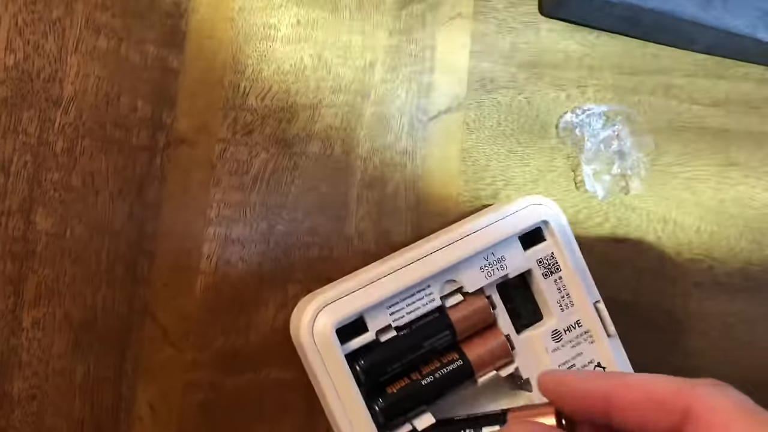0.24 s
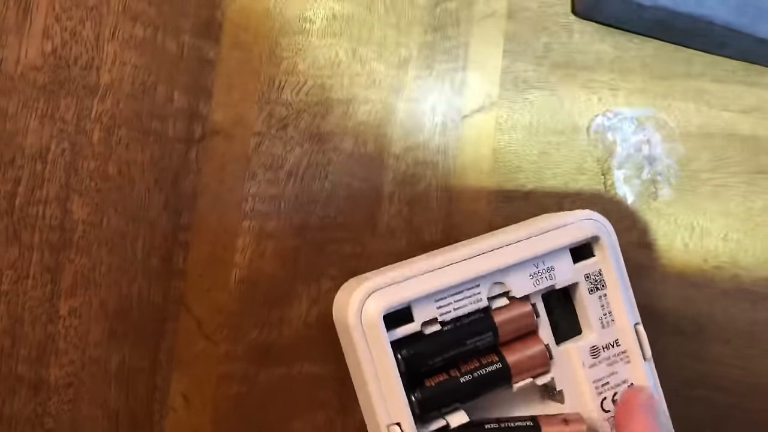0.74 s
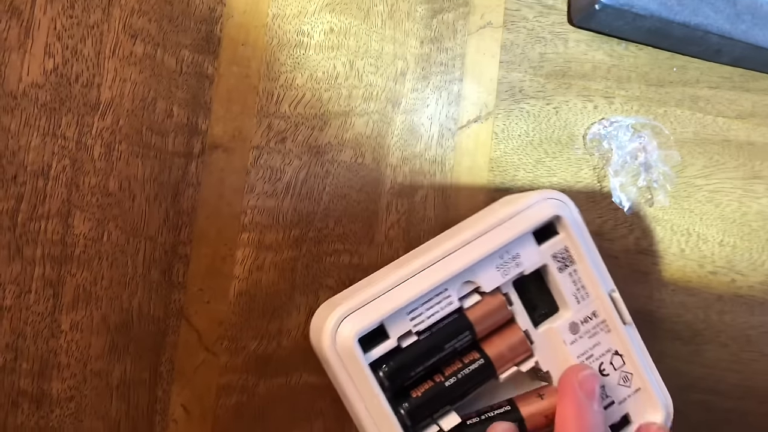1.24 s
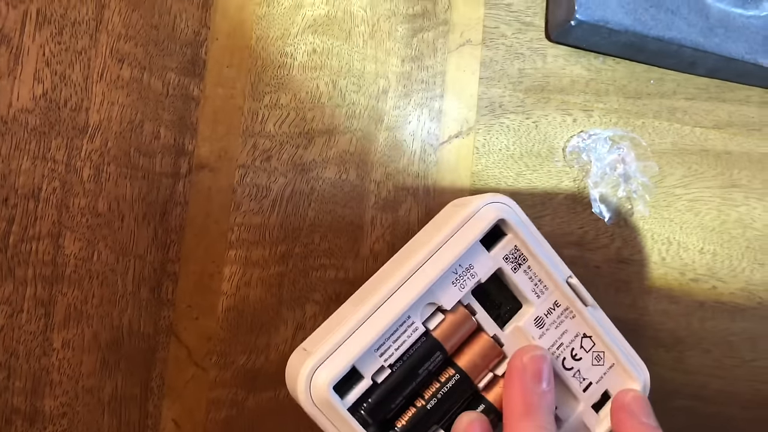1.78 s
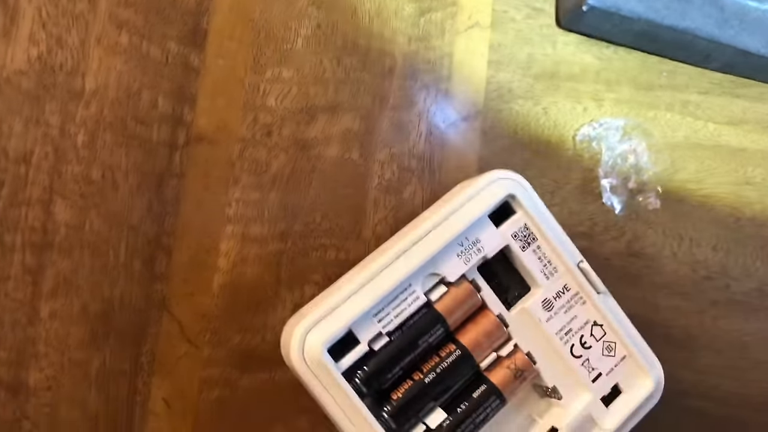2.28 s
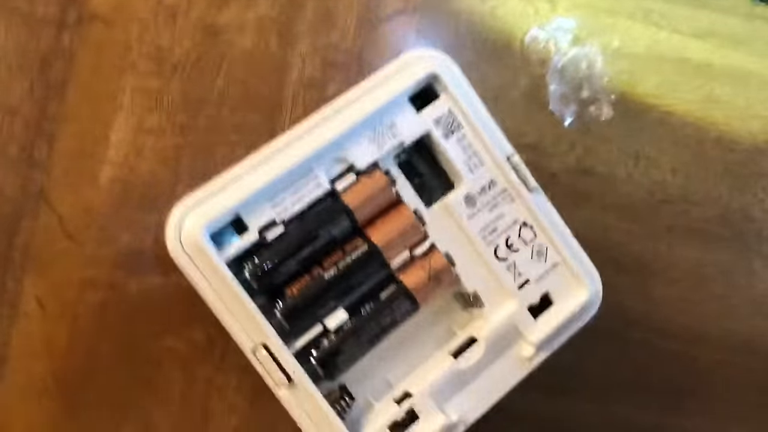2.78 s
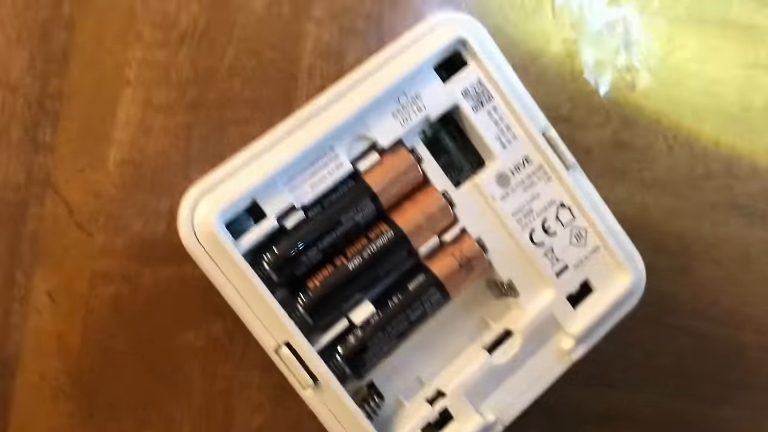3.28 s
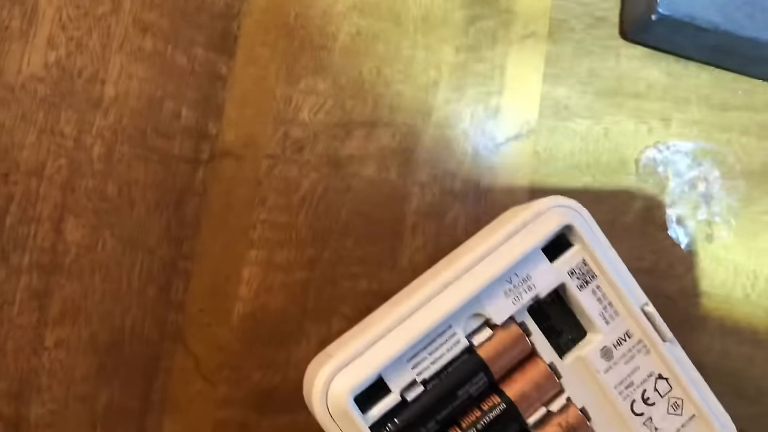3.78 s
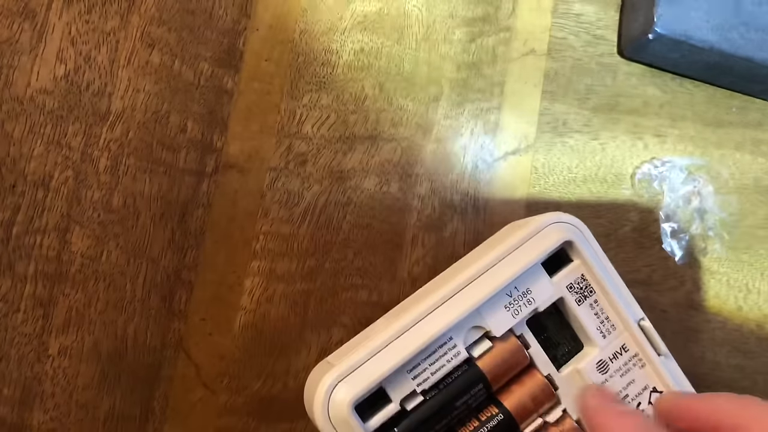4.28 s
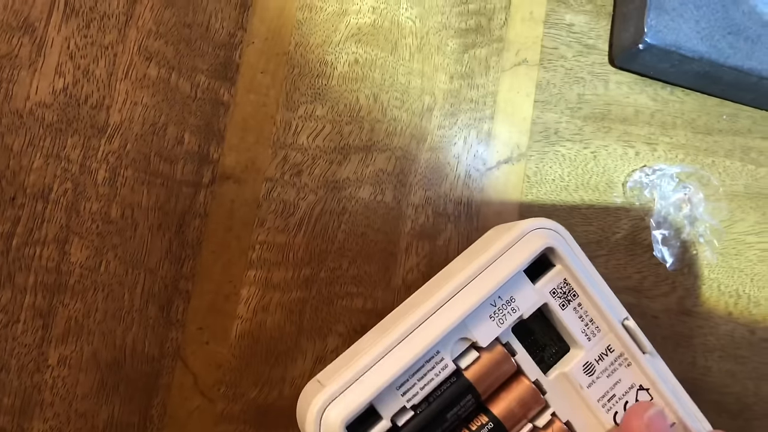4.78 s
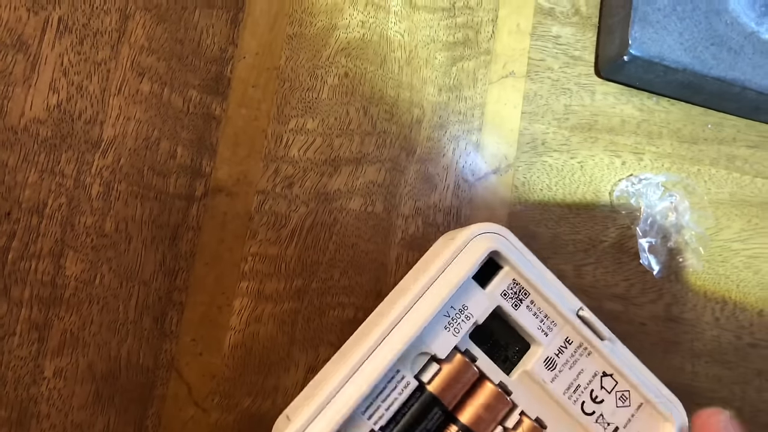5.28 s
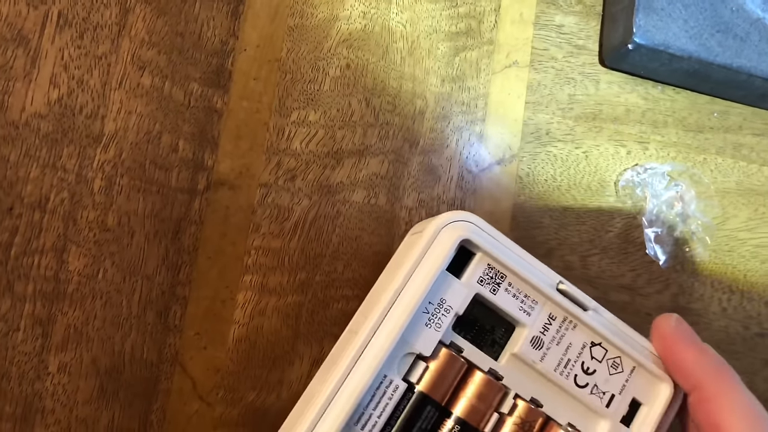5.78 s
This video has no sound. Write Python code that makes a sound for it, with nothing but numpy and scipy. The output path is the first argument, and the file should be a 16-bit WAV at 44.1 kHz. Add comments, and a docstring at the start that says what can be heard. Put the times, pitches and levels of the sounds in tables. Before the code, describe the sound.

A hushed room with a very faint low background, heard close up. Around 0.5 s light ticks and a soft rub begin as a battery is pushed, then a very loud, hard plastic snap cracks at 0.72 s with small after-clicks. Slight rubbing and ticks follow from 1.1 s, a moderate click at 1.3 s, a sharp double snap near 1.58 s, and another strong one at 1.96 s, each over a dull push. Tiny ticks and rubbing fade by 2.5 s. From 2.7 to 3.4 s soft, low wooden knocks patter, the strongest at 2.85 s. After a near-silent second, light rubbing returns at 4.5 s and a loud snap hits at 4.64 s. A smaller click comes at 5.08 s, then a quick bright cluster at 5.3 s ends in a loud snap. A faint tick at 5.56 s and a barely audible rub from 5.8 s close it.

```python
"""Batteries are pushed into a small plastic case held over a wooden table in a quiet, hushed room.
Pushes rumble in low modes; snaps ring shell, cells and contact springs, and the room answers with a tail.
Between them skin and cells rub the plastic: dense noise slips ring the case and hiss.
Midway, small knocks run through a board as falling chirps; then more pushes and snaps, and a last rub."""
import sys
import numpy as np
from scipy import signal
from scipy.fft import rfft, irfft, next_fast_len
from scipy.io import wavfile
from scipy.ndimage import uniform_filter1d, minimum_filter1d

SR = 44100
rng = np.random.default_rng(int(sys.argv[2]) if len(sys.argv) > 2 else 0)


def log_audio(samples):
    """Write samples as a 16-bit WAV file to the path given in sys.argv[1]."""
    # one column per channel
    frames = np.atleast_2d(samples).T
    # limit to full scale, then quantise
    limited = np.clip(frames, -1, 1)
    pcm = np.round(limited * 32767).astype(np.int16)
    wavfile.write(sys.argv[1], SR, pcm)


N = 266408
TOP_HZ = 16500


def undb(db):
    """dB to gain."""
    return 10 ** (np.asarray(db) / 20)


def unit(x):
    """Scale to rms 1."""
    return x / np.sqrt(np.mean(x ** 2))


def gain_at(table, size):
    """Gain of a (Hz, dB) spectrum on the bins of a transform, interpolated over log frequency."""
    table_hz, table_db = np.transpose(table)
    bin_hz = np.arange(size // 2 + 1) * SR / size
    return undb(np.interp(np.log(bin_hz + 1), np.log(table_hz), table_db))


def band(x, lo_hz, hi_hz):
    """Band-pass."""
    sos = signal.butter(2, [lo_hz, hi_hz], "bandpass", fs=SR, output="sos")
    return signal.sosfilt(sos, x)


def ring(modes, seconds, detune, pitch=1):
    """Sum of fading sines; each blow lands elsewhere, so pitch and weight scatter."""
    hz, db, t60_s = np.transpose(modes)[:, :, None]
    t = np.arange(int(seconds * SR)) / SR
    pitch_luck, level_luck = rng.standard_normal((2, len(modes), 1))
    tone = np.sin(2 * np.pi * pitch * hz * (1 + detune * pitch_luck) * t)
    level_db = db + 2.5 * level_luck - 60 * t / t60_s
    return np.sum(undb(level_db) * tone, axis=0)


def strike(response, chatter_s, grit):
    """One blow followed by a fading chatter of contacts; peak 1."""
    t = np.arange(int(6 * chatter_s * SR) + 2) / SR
    force = grit * rng.standard_normal(len(t)) * np.exp(-t / chatter_s) / np.sqrt(chatter_s * SR)
    force[0] = 1
    x = signal.fftconvolve(force, response)
    return x / np.abs(x).max()


def swell(x, rise_s=0.0012):
    """Ease a ring in with a linear rise to full swing."""
    return x * np.clip(np.arange(len(x)) / SR / rise_s, 0, 1)


def add(out, s, x):
    """Mix x in at s seconds."""
    i = int(s * SR)
    out[i:i + len(x)] += x[:N - i]


def air():
    """The room's quiet hush: shaped noise whose level drifts a little."""
    # relative hush spectrum: pitch_hz, density_db
    hush_spectrum = [(22, -45), (45, -9.5), (76, -2), (124, -3), (584, -14), (3510, -24), (10400, -26),
                     (15000, -32), (15900, -50)]
    level_db = -67
    size, hold = next_fast_len(N), SR // 8
    hush = irfft(rfft(rng.standard_normal(size)) * gain_at(hush_spectrum, size), size)[:N]
    drift = uniform_filter1d(rng.standard_normal(N // hold + 1).repeat(hold), hold)[:N]
    return undb(level_db + 2.3 * drift) * unit(hush)


def pushes():
    """A push is a slow, uneven shove: the low modes of case, table and room build up late."""
    # pushes before the band-pass: start_s, deep_peak_db, middle_re_deep_db, upper_re_deep_db
    shoves = [(0.354, -71, 17.5, 3), (0.476, -54, 13, 9), (0.59, -51.5, 0, -4.5), (0.735, -42.5, -0.5, 4.5),
              (1.13, -60.5, 5.5, 2.5), (1.222, -48.5, -6.5, -16), (1.447, -43.5, -2.5, -11.5),
              (1.581, -41, -1, 1), (1.709, -52.5, 0, -2), (1.964, -52.5, 2.5, 18.5), (2.422, -49, -9, -9),
              (4.476, -52, 8, 1), (4.598, -60.5, 19.5, 13.5), (4.65, -45.5, -10.5, 8.5),
              (4.95, -57, -3, 2.5), (5.085, -45.5, 3.5, 9), (5.314, -40, -2.5, 4)]
    # low modes: pitch_hz, level_db, t60_s
    deep = [(63, -1, 0.47), (84, -2, 0.45), (104, -5, 0.35)]
    # middle modes: pitch_hz, level_db, t60_s
    middle = [(183, -6.5, 0.22), (243, -8, 0.092), (307.6, -8, 0.081)]
    # upper modes: pitch_hz, level_db, t60_s
    upper = [(401, -1.5, 0.1), (425, 0, 0.22), (595, -10.5, 0.12)]
    lean_s = 0.013
    out = np.zeros(N)
    for s, db, middle_db, upper_db in shoves:
        deep_hit = strike(ring(deep, 0.6, 0.013), 0.025, 3.6)
        middle_hit = strike(ring(middle, 0.33, 0.047), 0.078, 3.8)
        upper_hit = strike(ring(upper, 0.3, 0.008), 0.025, 3.4)
        add(out, s, undb(db) * swell(deep_hit, lean_s))
        add(out, s, undb(db + middle_db) * swell(middle_hit, lean_s))
        add(out, s, undb(db + upper_db) * upper_hit)
    return band(out, 55, 1100)


def clicks():
    """Each click rings three parts; things this small radiate nothing below their own modes.
    The room hears all sides of the case at once, so there the modes blur into three broad bands."""
    # snaps and ticks before the band-passes: start_s, shell_peak_db, shell_pitch_hz,
    # cell_re_shell_db, spring_re_shell_db
    snaps = [(0.475, -44, 1600, 10.5, 1.5), (0.506, -30.5, 1620, 0, -28), (0.582, -34, 1580, 3.5, 2),
             (0.698, -42, 1640, -7.5, -17), (0.709, -35, 1690, -15, -30), (0.7212, 0.5, 1693, -5, -14),
             (0.7384, -14.5, 1600, -13.5, -23.5), (0.749, -24, 1650, 0, -15.5), (1.139, -46.5, 1810, 4, -9),
             (1.212, -50.5, 1950, 13, 15.5), (1.269, -37, 1160, -22, -30), (1.318, -40.5, 1610, 11, 9),
             (1.324, -24, 1720, 0, -2.5), (1.485, -40, 1280, -17, -24.5), (1.498, -47.5, 1486, 3, -11.5),
             (1.5767, -26.5, 1560, -4, -14.5), (1.581, -19.5, 1500, 12, 5.5),
             (1.584, -10.5, 1720, -21, -22), (1.933, -39, 2000, -2, -5), (1.9622, -7.5, 1460, -7.5, -8),
             (1.9659, -20.5, 1170, -1.5, -8), (2.238, -49, 1680, 0, -2), (2.411, -51.5, 1387, -16, -20.5),
             (2.437, -44, 1567, -10.5, -18), (4.473, -39.5, 1756, 11, 4), (4.493, -43, 1670, 2, 4.5),
             (4.596, -28.5, 1750, 1.5, -11), (4.641, -0.5, 1790, -3.5, -11), (4.6576, -12, 1634, -20, -27),
             (4.951, -46, 1556, -12, -10.5), (5.064, -28.5, 1650, -17.5, -30), (5.08, -19, 1710, -20, -24),
             (5.0828, -15.5, 1560, 2, -2.5), (5.196, -39.5, 1740, -0.5, -8), (5.2885, -18.5, 1740, -7, -10),
             (5.2925, -20.5, 1610, -5, 0), (5.2995, -22, 1730, -6.5, 16.5), (5.302, -12.5, 1620, -17.5, 0),
             (5.309, -19.5, 1480, -6, -2), (5.3126, -3, 1670, -11.5, -14.5), (5.559, -47, 1480, -3.5, -6)]
    # shell modes: multiple_of_shell_pitch, level_db, t60_s
    shell_modes = [(.8, -8, 0.0069), (1.0, 13, 0.0069), (1.2, 4, 0.007)]
    # cell modes: pitch_hz, level_db, t60_s
    cell_modes = [(2814, -2, 0.0076), (3440, 3.5, 0.004), (4120, -4.5, 0.0029), (4810, -4.5, 0.0029)]
    # contact spring modes: pitch_hz, level_db, t60_s
    spring_modes = [(5760, 4, 0.0042), (6510, 0, 0.0037), (7810, 2.5, 0.003), (10040, 1.5, 0.0012),
                    (13300, -9, 0.0026)]
    # narrow extra tones, from few-millisecond ticks to one longer ping, some on top of a snap:
    # start_s, level_db, pitch_hz, t60_s
    extra_tones = [(1.325, -42, 3280, 0.19), (2.0375, -35, 2780, 0.017), (4.9965, -15, 4700, 0.0027),
                   (5.2997, -7, 12440, 0.0049), (5.2995, -10, 15000, 0.0061)]
    # shell as the room hears it: multiple_of_shell_pitch, level_db, t60_s
    shell_blur = [(.85, -3, 0.009), (1.08, -3, 0.009)]
    # cell, then spring, as the room hears them: low_hz, high_hz, level_db
    sharp_blur = [(2320, 5400, 21), (4800, 9000, 15)]
    drag_db = 24.5  # lighter touches drag: chatter grows by its own length per step of this size

    shell, cell, spring, blur, extra = np.zeros((5, N))
    blows = np.zeros((2, N))
    for s, db, hz, cell_re_db, spring_re_db in snaps:
        cell_db, spring_db = db + cell_re_db, db + spring_re_db
        cell_drag = 1 + max(-cell_db, 0) / drag_db
        spring_drag = 1 + max(-spring_db, 0) / drag_db
        shell_hit = strike(swell(ring(shell_modes, 0.03, 0.018, hz)), 0.0015, 0.2)
        cell_hit = strike(ring(cell_modes, 0.02, 0.088), 0.0013 * cell_drag, 4.2)
        spring_hit = strike(ring(spring_modes, 0.02, 0.08), 0.0013 * spring_drag, 3.5)
        add(shell, s, undb(db) * shell_hit)
        add(blur, s, undb(db) * ring(shell_blur, 0.02, 0.014, hz))
        add(cell, s, undb(cell_db) * cell_hit)
        add(spring, s, undb(spring_db) * spring_hit)
        blows[:, int(s * SR)] = undb([cell_db, spring_db])
    for s, db, hz, t60_s in extra_tones:
        add(extra, s, swell(ring([(hz, db, t60_s)], 0.3, 0.00148)))

    blur = band(blur, 820, 3900)
    for blow, (lo_hz, hi_hz, db) in zip(blows, sharp_blur):
        blur = blur + undb(db) * band(blow, lo_hz, hi_hz)
    direct = band(shell, 770, 3500) + band(cell, 1600, 6200) + band(spring, 3600, TOP_HZ)
    return direct, blur, extra


def room(x, blur):
    """A diffuse noise tail that fades octave by octave."""
    # octave tails: centre_hz, level_db, t60_s
    octaves = [(650, -7.5, 0.33), (1450, -4, 0.4), (2840, -4, 0.42), (5730, -2.5, 0.41), (11000, 4.5, 0.29)]
    tail_db, facing_db = -18, -7.5  # tail energy; share of the sharp modes in it
    t, half = np.arange(int(0.8 * SR)) / SR, np.sqrt(2)
    tail = np.zeros(len(t))
    for hz, db, t60_s in octaves:
        noise = unit(band(rng.standard_normal(len(t)), hz / half, hz * half))
        tail += undb(db - 60 * t / t60_s) * noise
    tail = tail * np.clip((t - 0.002) / 0.0055, 0, 1)
    tail = undb(tail_db) * tail / np.sqrt(np.sum(tail ** 2))
    return signal.fftconvolve(undb(facing_db) * x + blur, tail)[:N]


def rubbing():
    """Dense slips of uneven size ring the shell and cells and hiss."""
    # slides of skin and cells: start_s, length_before_lift_s, start_level_db, hiss_re_level_db
    slides = [(0.505, 0.1, -57, -17), (1.076, 0.11, -65.5, -1), (1.337, 0.23, -58, -32),
              (1.691, .08, -53.5, -22), (1.803, .04, -61.5, -13), (2.225, 0.115, -61, -2),
              (4.47, 0.042, -59, 0), (4.546, 0.053, -63, -8), (4.884, 0.071, -62, -4.5),
              (5.19, 0.046, -64, -2), (5.47, 0.094, -72.5, 7), (5.785, 0.23, -68, -13)]
    # the case as a slide excites it: pitch_hz, level_db, t60_s
    held_modes = [(1480, -6, .02), (1704, 0, 0.019), (2154, -5, 0.02)]
    # a slide starts fast, weakens, then lifts off
    grip_s, fade_db_per_s, lift_s = 0.015, 29, 0.025

    slip_db = 2 * np.minimum(rng.exponential(size=N // 40 + 1), 5)
    slips = rng.standard_normal(N) * undb(slip_db).repeat(40)[:N]
    flutter_db = 1.3 * unit(band(rng.standard_normal(N), 8, 45))
    slips = slips * undb(flutter_db)  # the grip flutters
    ringing = unit(np.convolve(slips, ring(held_modes, 0.06, 0.0062))[:N])
    body = unit(ringing + 0.6 * unit(band(slips, 1300, 3600)))
    hiss = unit(band(slips, 1700, 5800))

    out = np.zeros(N)
    for s, length_s, db, hiss_db in slides:
        span = slice(int(s * SR), int((s + length_s + lift_s) * SR))
        skin = body[span] + undb(hiss_db) * hiss[span]
        t = np.arange(len(skin)) / SR
        edge = np.clip(np.minimum(t / grip_s, 1 + (length_s - t) / lift_s), 0, 1)
        add(out, s, edge * undb(db - fade_db_per_s * t) * skin)
    return out


def knocks():
    """Bending waves run at a speed that grows as the root of pitch: treble first, bass last."""
    # knocks on the board: start_s, peak_db, tick_re_peak_db, lag_ms (scale of the delay law below)
    taps = [(2.681, -39, 0, 5.4), (2.699, -37.5, -10, 2.26), (2.707, -40, -9, 2.4), (2.771, -45, -6.5, 3),
            (2.786, -38.5, -11, 2.3), (2.806, -35.5, 0, 4), (2.838, -44, -30, 3), (2.847, -22, -28, 4.64),
            (2.887, -45, -1, 3.1), (2.911, -40.5, -4.5, 3.1), (3.0003, -32.5, -8.5, 2.7),
            (3.021, -36.5, -6.5, 3.74), (3.033, -42, -17, 2.8), (3.0726, -37.5, -6, 3.6),
            (3.084, -34.5, -8, 2.26), (3.2205, -40, -8, 3.16), (3.400, -47, -23.5, 2.55)]
    # relative board spectrum: pitch_hz, density_db
    board = [(60, -24), (150, 2), (240, 2.5), (360, 1), (720, -9.5), (1300, -21.5), (2500, -43),
             (5000, -70)]
    edge_s, edge_share = 0.0091, 0.78  # scattered returns from the edges: fading time, strength
    size, lead = 4096, 256  # samples
    hz = np.arange(size // 2 + 1) * SR / size
    tick_t = np.arange(300) / SR
    out, ticks = np.zeros((2, N))
    for s, db, tick_db, lag_ms in taps:
        # phase in turns; its slope is the delay lag * (sqrt(1000 / hz) - 0.6)
        turns = lag_ms / 1000 * (2 * np.sqrt(1000 * hz) - hz * 0.6)
        spectrum = gain_at(board, size) * np.exp(-2j * np.pi * turns)
        chirp = np.roll(irfft(spectrum, size), lead)
        add(out, s - lead / SR, undb(db) * strike(chirp, edge_s, edge_share))
        tick = band(rng.standard_normal(300) * np.exp(-tick_t / 0.0015), 940, 8700)
        add(ticks, s, undb(db + tick_db) * tick / np.abs(tick).max())
    return out + ticks


def scene():
    """Everything near the microphone, its room, and the hush."""
    snaps, blur, extra = clicks()
    near = snaps + rubbing()
    return (near + extra + room(near, blur) + pushes() + knocks() + air())[None]


def record(dry):
    """A quick limiter holds the loudest snaps; a steep low-pass leaves nothing above TOP_HZ."""
    limit, limit_samples = 0.9, 45
    gain = minimum_filter1d(limit / np.maximum(np.abs(dry), limit), 2 * limit_samples + 1)
    held = dry * uniform_filter1d(gain, limit_samples)
    top_cut = signal.ellip(12, 0.2, 95, TOP_HZ, fs=SR, output="sos")
    return signal.sosfilt(top_cut, held)


dry = scene()
out = record(dry)
log_audio(out)
```